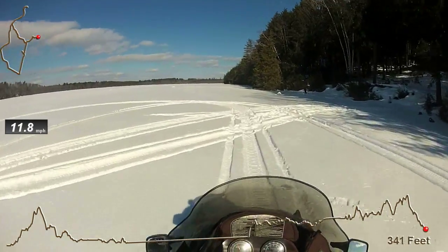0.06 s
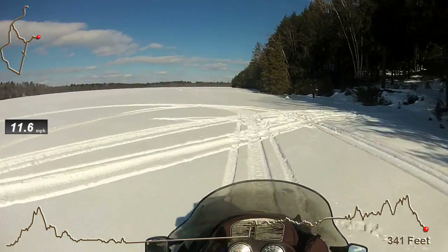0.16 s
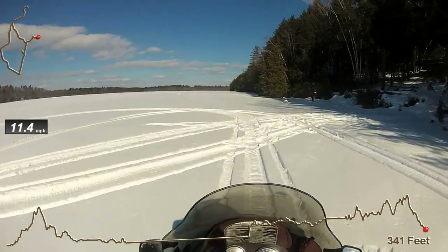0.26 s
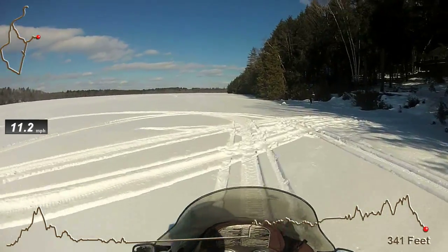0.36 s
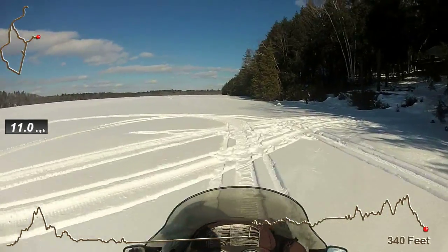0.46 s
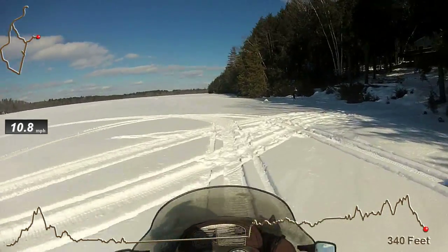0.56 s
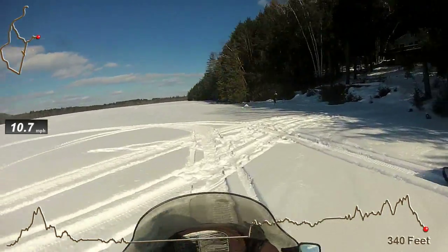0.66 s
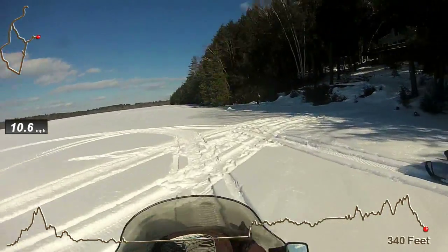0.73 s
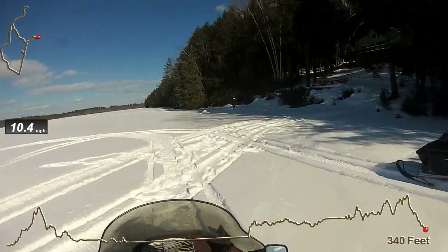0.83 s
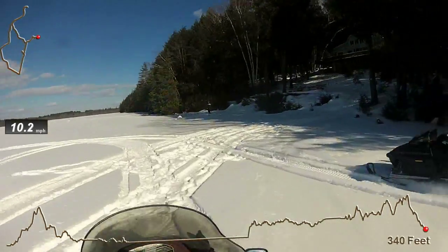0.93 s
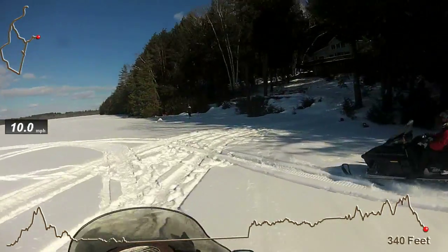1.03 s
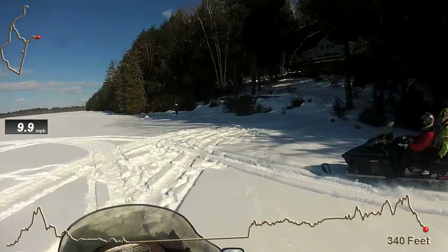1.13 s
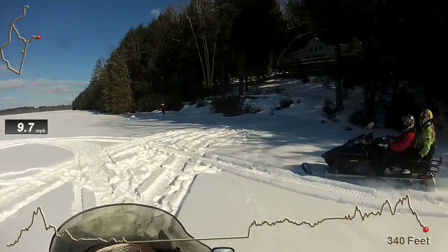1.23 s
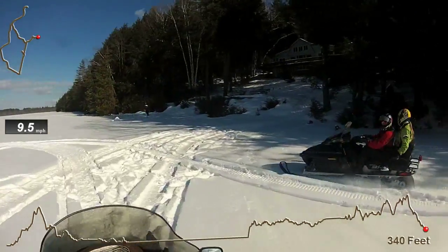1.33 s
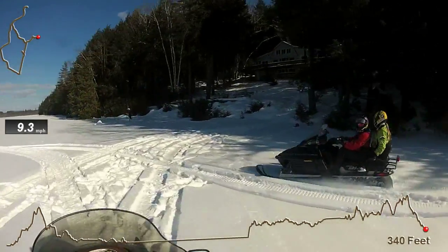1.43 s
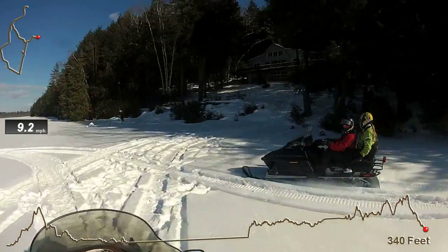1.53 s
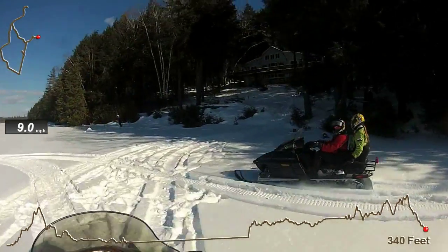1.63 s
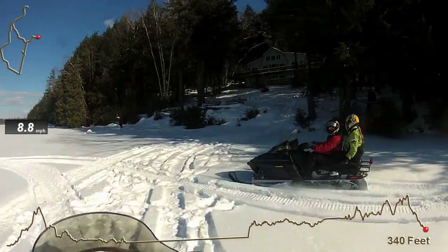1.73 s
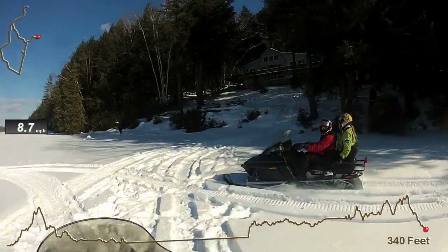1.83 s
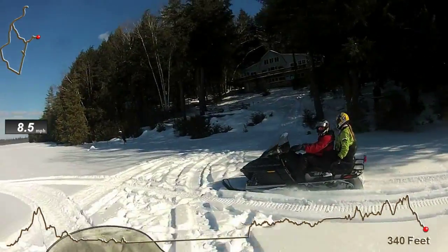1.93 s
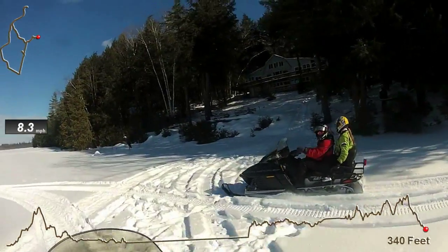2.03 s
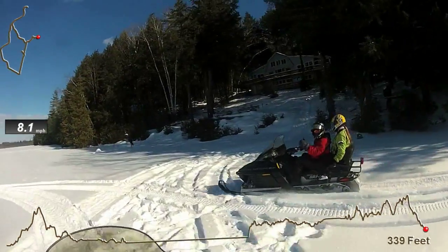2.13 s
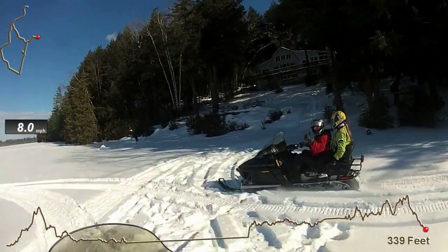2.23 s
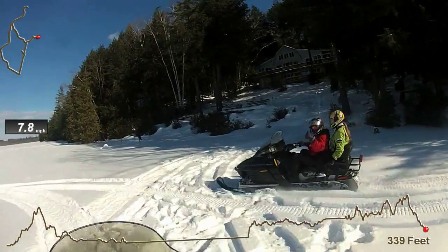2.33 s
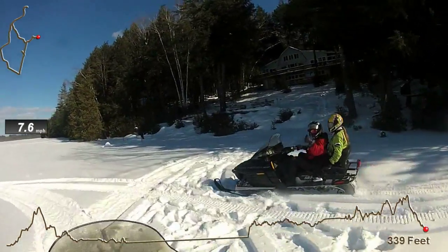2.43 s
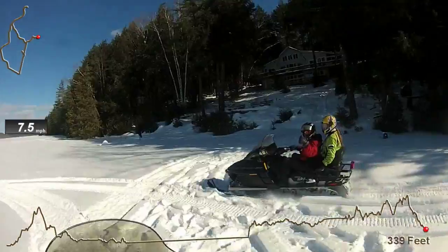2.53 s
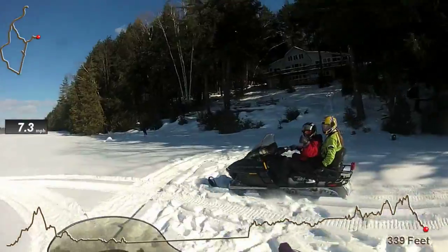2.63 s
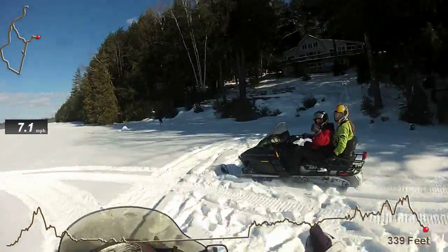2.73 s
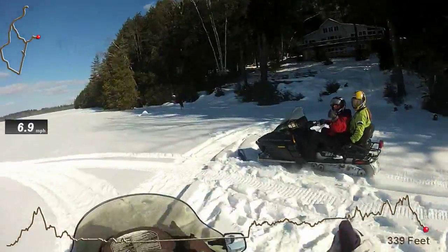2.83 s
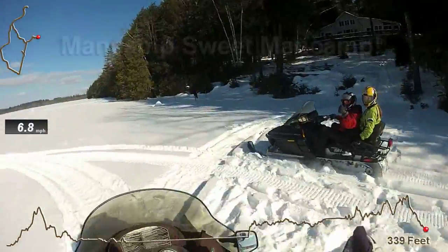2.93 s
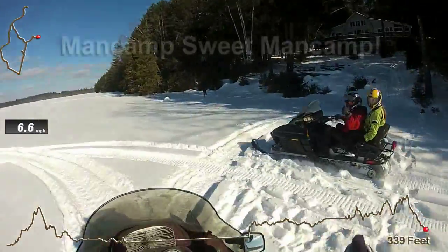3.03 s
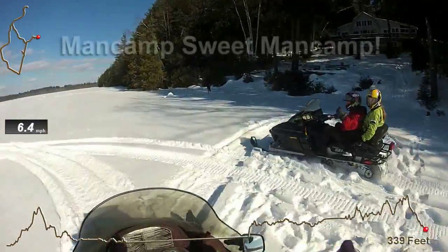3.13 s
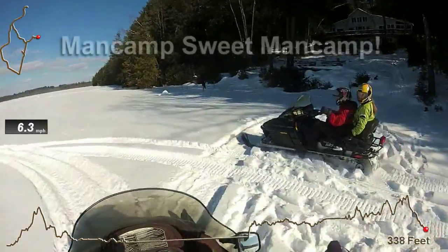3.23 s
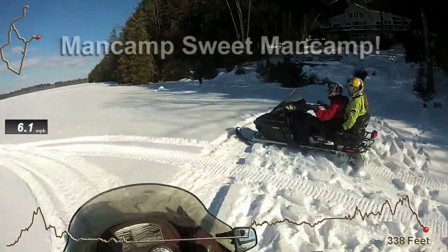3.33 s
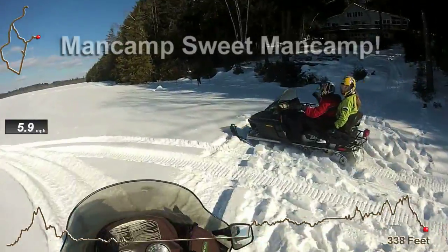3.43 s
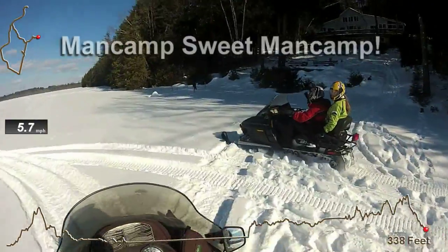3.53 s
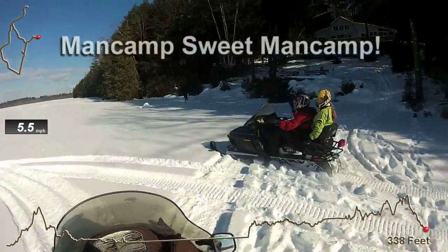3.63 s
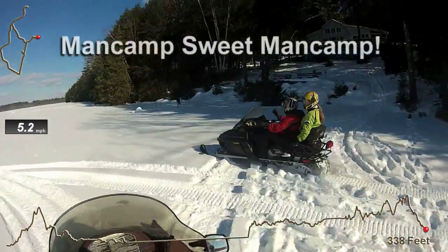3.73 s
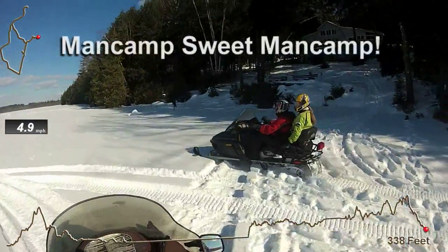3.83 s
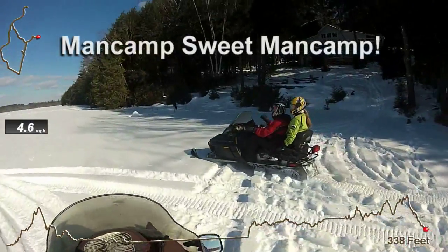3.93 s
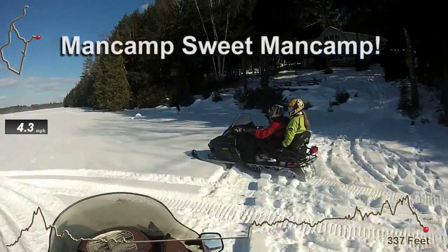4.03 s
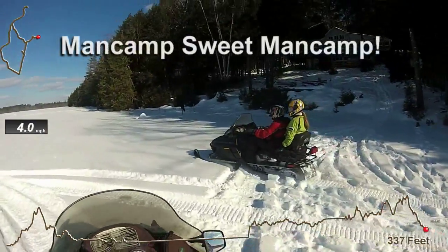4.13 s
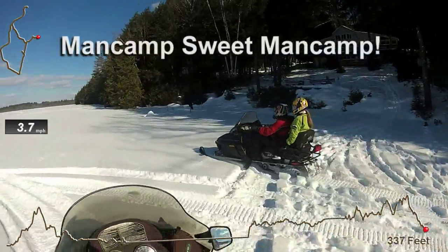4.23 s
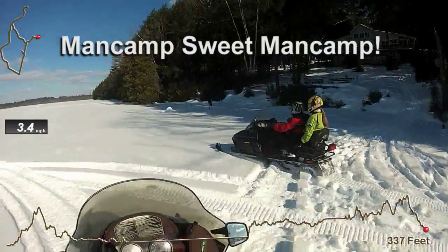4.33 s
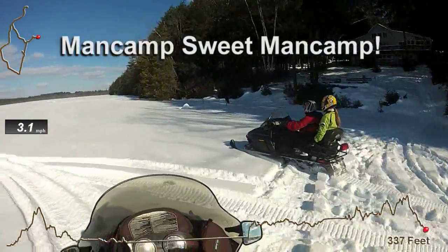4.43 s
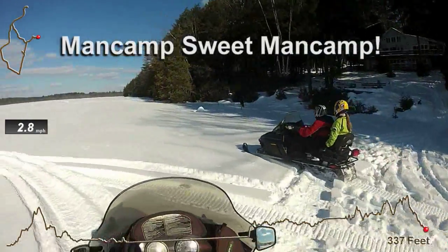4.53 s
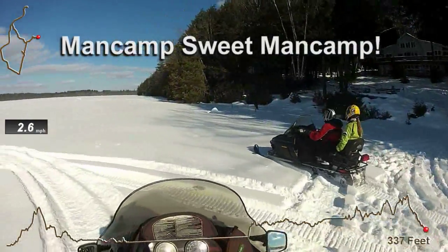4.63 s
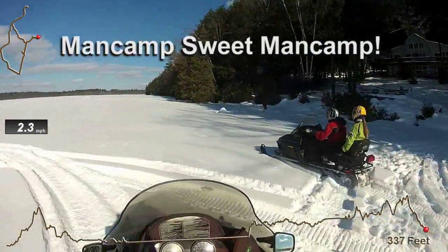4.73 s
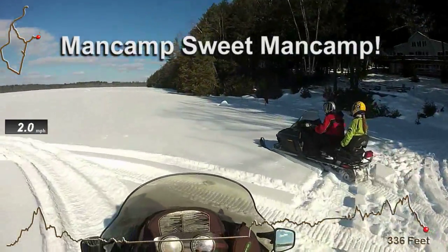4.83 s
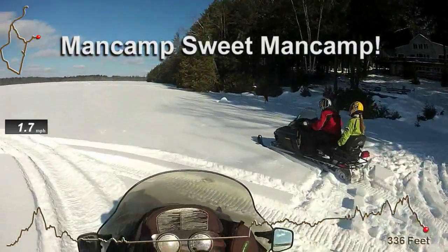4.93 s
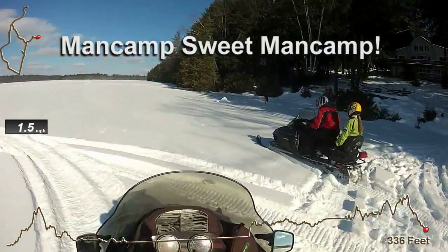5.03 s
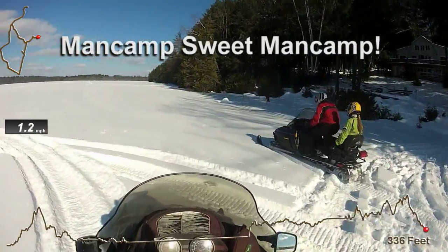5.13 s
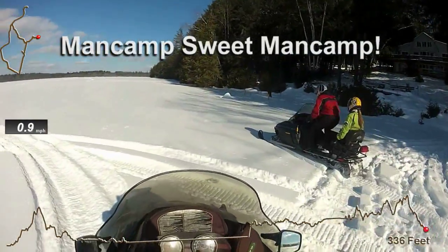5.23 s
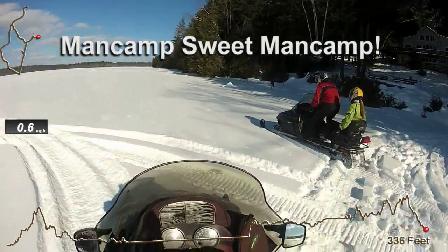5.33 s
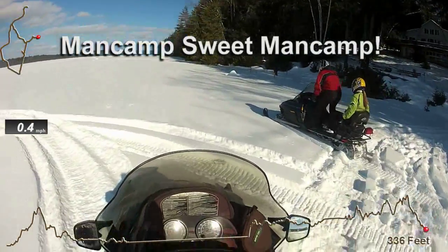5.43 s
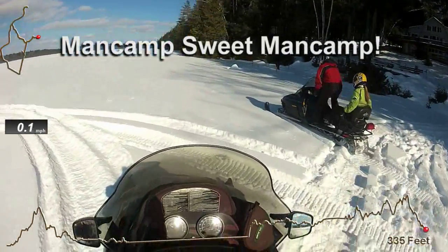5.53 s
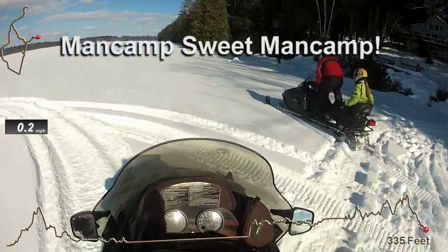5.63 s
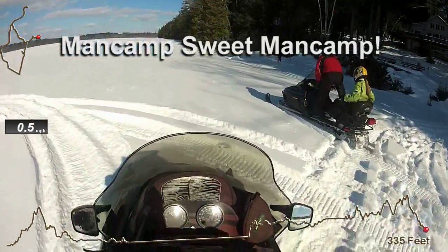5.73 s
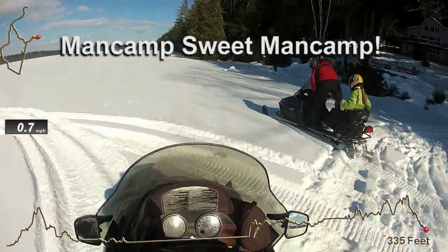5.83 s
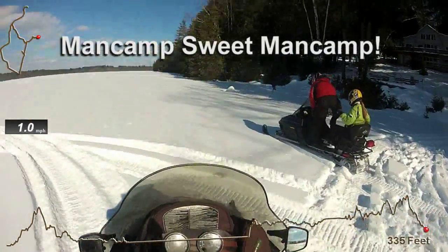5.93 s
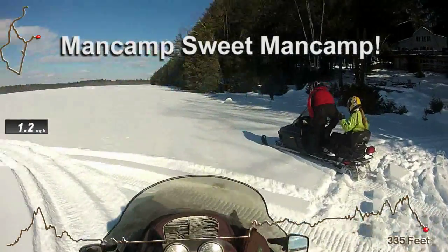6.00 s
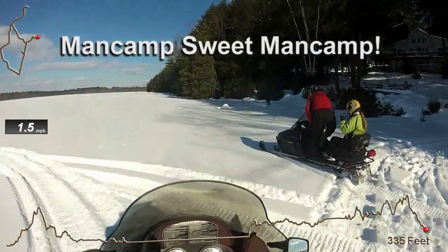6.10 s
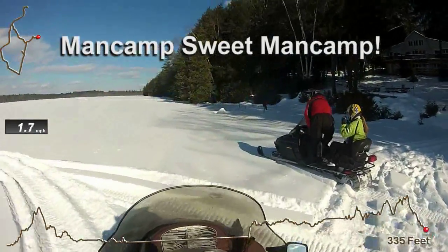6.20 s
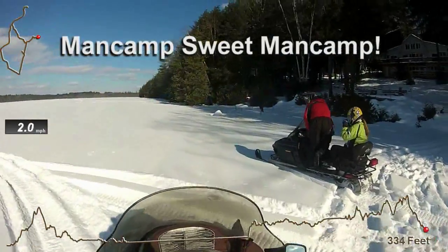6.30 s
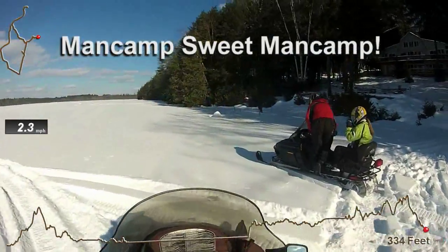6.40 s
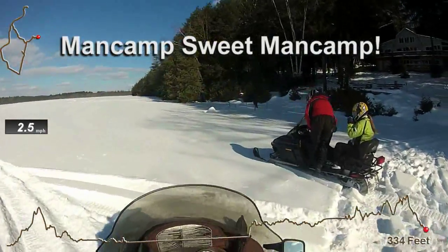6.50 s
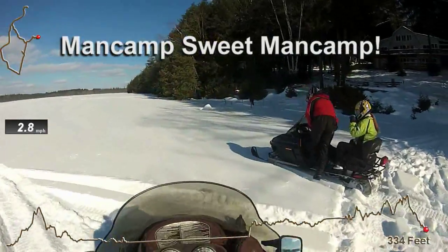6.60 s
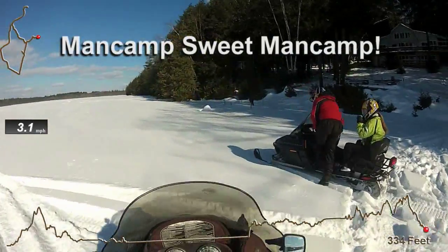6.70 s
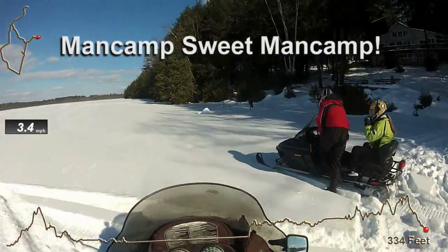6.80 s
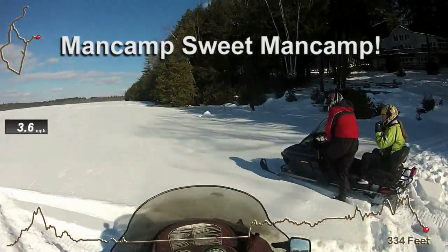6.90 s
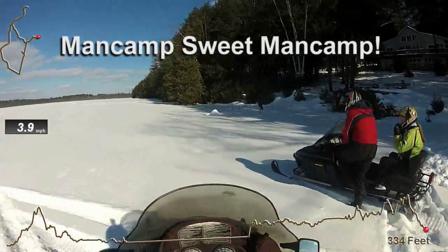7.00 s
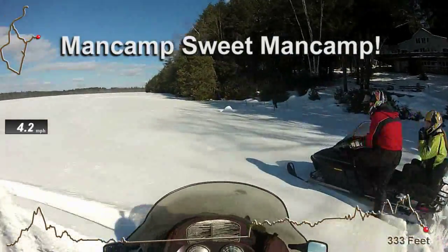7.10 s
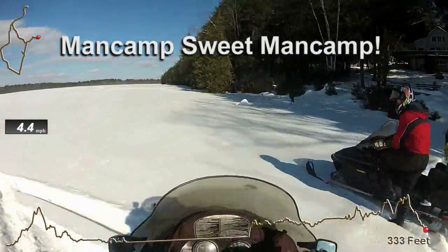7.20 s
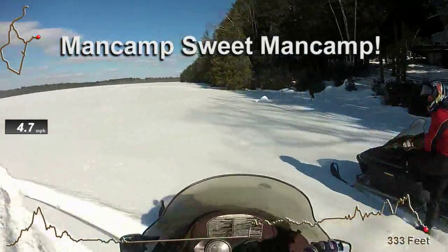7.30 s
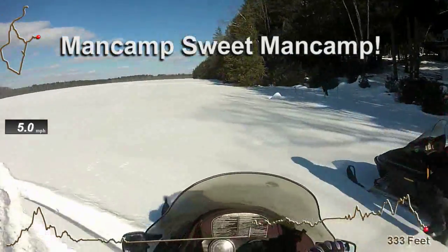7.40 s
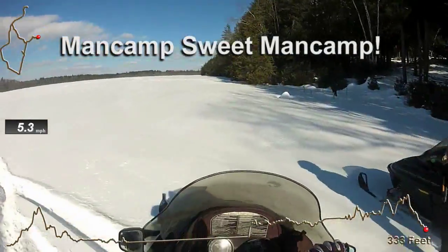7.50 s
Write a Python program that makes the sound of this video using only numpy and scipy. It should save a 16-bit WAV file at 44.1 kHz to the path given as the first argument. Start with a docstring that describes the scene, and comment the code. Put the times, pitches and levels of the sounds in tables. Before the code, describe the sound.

Close onboard sound of a snowmobile slowing on a snowy pond: throaty two-stroke buzz falling, rumbling roughly over ruts, then softening to separate putters. Another machine idles dully beside it. After a tiny squeak, one brisk throttle burst climbs to a steady raspy blare for about a second, then falls with a few loose knocks. No echo; lo-fi, fizzy treble.

```python
"""A twin-cylinder two-stroke snowmobile, heard from the rider's seat, coasts to a stop on a snowy pond, revs once
and eases off. Firings ring the exhaust, the crank shakes the hood, metal parts clatter and snow hisses.
A second sled winds down to idle nearby; the track drums, the chassis knocks and the brake squeaks.
The camera holds each sample at a low rate, which adds a fizzy top."""
import sys
import numpy as np
from scipy import signal
from scipy.fft import rfft, irfft
from scipy.io import wavfile
from scipy.ndimage import uniform_filter1d

SR = 44100
rng = np.random.default_rng(int(sys.argv[2]) if len(sys.argv) > 2 else 0)


def output_pcm(signal):
    """Save a mono or channel-first signal as 16-bit PCM at the path in sys.argv[1].

    Samples are clipped to [-1, 1] before scaling.
    """
    pcm = np.clip(np.atleast_2d(signal).T, -1, 1) * 32767
    wavfile.write(sys.argv[1], SR, np.round(pcm).astype(np.int16))


N = 333394

# Response of the exhaust pipe and silencer. Each row: frequency in Hz, relative level in dB.
PIPE = [(45, -45), (65, -11.5), (90, -7), (122, 7.5), (145, -0.5), (178, -12.5), (212, -10), (240, -22),
        (302, -8), (380, -33), (445, -29.5), (482, -19), (540, -37.5), (630, -11), (705, -24), (800, -69),
        (1000, -20.5), (1350, -27)]


def undb(db):
    """Decibels to amplitude gain."""
    return 10 ** (np.asarray(db) / 20)


def unit(x):
    """Scale to rms 1."""
    return x / np.sqrt(np.mean(x ** 2))


def steady(x, seconds=0.16):
    """Scale to a running rms of 1."""
    power = np.abs(uniform_filter1d(x ** 2, int(seconds * SR)))
    return x / np.sqrt(power + 1e-18)


def curves(table):
    """Each column after the first (time in s), interpolated to one value a sample."""
    s, *columns = np.transpose(table)
    return [np.interp(np.arange(N) / SR, s, c) for c in columns]


def noise():
    """White noise of spread 1."""
    return rng.standard_normal(N)


def walk(rate_hz):
    """Smoothed random steps of rms 1, rate_hz steps a second."""
    step = int(SR / rate_hz)
    held = np.repeat(rng.standard_normal(N // step + 1), step)
    return unit(uniform_filter1d(held, step)[:N])


def bump(x, centre, spread):
    """Gaussian bell of height 1, down to 1/e at the spread."""
    return np.exp(-((x - centre) / spread) ** 2)


def colour(x, points, size=8192):
    """Minimum-phase filter through (Hz, dB) points: a causal body set ringing."""
    hz, db = np.transpose(points)
    octave = np.log2(np.maximum(np.arange(size // 2 + 1) * SR / size, 1))
    known = np.log2(hz)
    outside = np.abs(octave - np.clip(octave, known[0], known[-1]))
    # 36 dB per octave beyond the end points, at most 60 dB
    response_db = np.interp(octave, known, db) - np.minimum(36 * outside, 60)
    # folding the cepstrum makes the response causal
    cepstrum = irfft(np.log(undb(response_db)))
    cepstrum[1:size // 2] *= 2
    cepstrum[size // 2 + 1:] = 0
    return signal.fftconvolve(x, irfft(np.exp(rfft(cepstrum))))[:N]


def firings(turns, scatter_db, weak_db, jitter):
    """Two pulses a crank turn, one per cylinder, scattered in size and time; every second one is weaker."""
    at = np.flatnonzero(np.diff(np.floor(2 * turns)))
    chance = rng.standard_normal((len(at), 2))
    size = undb(scatter_db[at] * chance[:, 0] - weak_db[at] * (np.arange(len(at)) % 2))
    # jitter: fraction of the firing interval per dB of scatter
    late = jitter * scatter_db[at] * chance[:, 1] * np.gradient(at)
    return np.bincount(np.clip(at + late, 0, N - 1).astype(int), size, N)


def clatter(turns, repeat, depth, count=70):
    """Impacts recurring at the same crank angles, plus noise, in a rush that swells with each firing."""
    angle, size = rng.random(count), rng.standard_normal(count)
    crank_angle = np.arange(int(turns[-1]) + 1)[:, None] + angle
    when = np.interp(crank_angle, turns, np.arange(N), right=N)
    sizes = size + 0.61 * rng.standard_normal(when.shape)
    impacts = np.bincount(when.astype(int).ravel(), sizes.ravel(), N + 1)[:N]
    rush = np.exp(depth * np.cos(4 * np.pi * turns))
    return (repeat * steady(impacts) + noise()) * rush


def effort(crank_hz, load):
    """Five level drivers: a constant, octaves below and above cruise, load, and the strain of speeding up."""
    cruise_hz, strain_lag_s = 50, 0.37
    octaves = np.log2(crank_hz / cruise_hz)
    # strain: upward octaves per second; the drive stays strained for a while
    keep = np.exp(-1 / (strain_lag_s * SR))
    strain = signal.lfilter([1 - keep], [1, -keep], np.maximum(np.gradient(octaves) * SR, 0))
    return np.array([np.ones(N), np.minimum(octaves, 0), np.maximum(octaves, 0), load, strain])


def drone(turns, crank_hz, load, soften_db=8, even_db=16, waver_db=2.0):
    """Regular part of the firings: crank overtones slide through the pipe's resonances; also their joint gain in dB."""
    # Overtone strength, from twice the crank rate upward. Each row: dB coasting, dB at full load.
    orders_db = [(3, 0.5), (-13, 1.5), (0, -3), (-1, -0.5), (-5.5, 7.5), (-6, -4), (-6, 1.5), (-8, -10),
                 (-3.5, 5), (-23, 5), (-19, -6), (-13, 9), (-23, 0), (-16, 0), (-6, -2), (-20, -17),
                 (-30, -19), (-23, -9)]
    pipe_hz, pipe_db = np.transpose(PIPE)
    # octaves below 55 Hz: the pulses soften and even out
    slow = np.maximum(np.log2(55 / crank_hz), 0)
    out, power = 0, 0
    for order, (coast_db, load_db) in enumerate(orders_db, 2):
        db = np.interp(np.log(order * crank_hz), np.log(pipe_hz), pipe_db)
        db += coast_db + load * (load_db - coast_db)
        db -= soften_db * slow * np.clip(order - 6, 0, 2)
        db -= even_db * slow ** 2 * (order % 2)
        waver = waver_db * (order > 4) * (1.48 - 0.73 * load) * walk(18)
        gain = undb(db + waver)
        phase = rng.uniform(-np.pi / 2, np.pi / 2)
        out = out + gain * np.cos(2 * np.pi * order * turns + phase)
        power = power + gain ** 2
    return out, 10 * np.log10(power)


def exhaust(turns, crank_hz, load, drive):
    """Clean under load, ragged off throttle, louder where an overtone meets a resonance of the pipe."""
    # Level laws: dB at cruise, dB per octave below it, dB per octave above it, dB at full load,
    # dB per octave a second of speeding up.
    boom_law = (-34.5, 4, 2.5, 2, 0.1)
    ring_law = (-53, 4, 5, -5, 4.5)
    # Brief dips and swells of the boom, the early ones as the two sleds' drones beat together.
    # Each row: middle in seconds, length in seconds, change in dB.
    level_dips_and_swells = [(0.126, 0.042, -8), (0.22, 0.064, 3), (0.266, 0.057, -4), (0.493, 0.067, -4),
                             (0.592, .05, 2), (.9, 0.045, -9), (3.368, 0.027, -10), (4.158, 0.4, 3),
                             (4.68, 0.18, -2), (5.01, 0.066, -2), (5.216, 0.095, -5.5), (6.851, .12, -4.5),
                             (7.118, 0.041, 1)]
    pipe_swell = 0.58  # share of the resonant gain that shows in the boom's level
    # uneven firing against the drone: coasting, change at full load, dB lost per dB of resonance
    ragged_coast_db, ragged_load_db, ragged_tuned = -6, -42, 0.95
    ragged_db_per_octave = 5  # below cruise the firing settles toward an even idle
    ring_hz, ring_width_hz = 480.5, 19.7  # the pipe's sharpest resonance
    # swell as the eighth overtone crosses the ring: coasting, more at full load, half width
    bloom_db, bloom_load_db, bloom_hz = 7, 3, 13
    flutter_db, ring_flutter_db = .7, 2

    tone, tuned_db = drone(turns, crank_hz, load)
    # off throttle each firing is stronger or weaker than the mean
    at = np.flatnonzero(np.diff(np.floor(2 * turns)))
    uneven = np.bincount(at, rng.standard_normal(len(at)), N)
    ragged_db = ragged_coast_db + ragged_load_db * load ** 2
    ragged_db += ragged_db_per_octave * drive[1] - ragged_tuned * tuned_db
    boom = steady(tone) + undb(ragged_db) * steady(colour(uneven, PIPE[:8]))
    t = np.arange(N) / SR
    dip_swell_db = sum(db * bump(t, s, length / 2) for s, length, db in level_dips_and_swells)
    boom_db = np.dot(boom_law, drive) + pipe_swell * tuned_db + dip_swell_db
    boom_db += flutter_db * (1 - load) * walk(20)

    # with the throttle open the pulses are regular, so overtones glide through the ring
    scatter_db = .7 + 4 * (1 - load) ** 3
    gas = steady(firings(turns, scatter_db, np.full(N, 3), jitter=.008)) + .3 * noise()
    ring = signal.lfilter(*signal.iirpeak(ring_hz, ring_hz / ring_width_hz, fs=SR), gas)
    ring = signal.lfilter(*signal.iirpeak(ring_hz, 3, fs=SR), ring)
    crossing = bump(8 * crank_hz, ring_hz, bloom_hz)
    ring_db = np.dot(ring_law, drive) + crossing * (bloom_db + bloom_load_db * load)
    ring_db += ring_flutter_db * (1 - load) * walk(25)
    return steady(boom) * undb(boom_db) + steady(ring) * undb(ring_db)


def engine():
    """The rider's own machine: exhaust, shaking hood, metal clatter, snow under the skis and chassis rumble."""
    # Each row: time in seconds, crankshaft turns per second in Hz.
    crank = [(0.0, 67.1), (0.9, 61.44), (2.1, 53.24), (2.84, 46.18), (3.14, 42.64), (3.75, 32.67),
             (4.15, 28.84), (4.86, 24.1), (5.01, 26.24), (5.13, 34.07), (5.3, 50.76), (5.69, 73.63),
             (5.91, 70.02), (6.7, 70.66), (6.97, 59.7), (7.33, 52.94), (7.56, 50.58)]
    # Each row: time in seconds, throttle load from 0 to 1.
    throttle = [(0, 0), (1.4, 0.2), (2.3, 0), (4.3, 0.28), (4.95, 0.08), (5.2, 0.32), (5.85, 0.96),
                (6.7, 0.97), (7, 0.11), (7.56, 0)]
    # Spectra of the engine case, fins, snow and chassis. Each row: frequency in Hz, relative level in dB.
    case_spectrum = [(320, -31.5), (540, -12), (590, -8), (629, -1.5), (684, 1), (755, -6.5), (800, -9),
                     (905, 2.5), (1040, -1.5), (1110, 3), (1290, 7), (1540, -8), (1750, -8), (2280, -37.5),
                     (3850, -120)]
    fins_spectrum = [(940, -44.5), (1600, 2.5), (1820, 3), (2110, 6.5), (2320, 12.5), (2560, 4), (2790, -1),
                     (2880, -34), (3000, -1), (3900, -72), (6600, -120)]
    snow_spectrum = [(1650, -23), (2800, -13), (2870, -2), (3110, 1), (3290, 0), (3630, 1.5), (4610, -8.5),
                     (4970, -2.5), (5360, -1), (5650, -4), (5900, 9.5), (7670, -54), (13000, -120)]
    rumble_spectrum = [(15, -35), (35, -2), (55, 6), (110, -6), (220, -3), (320, -6), (420, -15),
                       (700, -26.5)]
    # Level laws: dB at cruise, dB per octave below it, dB per octave above it, dB at full load,
    # dB per octave a second of speeding up.
    shake_law = (-48.5, 5, -0.5, 2, -1)
    case_law = (-44.5, 12, 10.5, -7.5, 2.5)
    fins_law = (-47.5, 16, 11.5, -5, 0.7)
    snow_law = (-51.5, 12.5, 8.5, -3, 1.1)
    rumble_law = (-45, 9.5, 6.5, -7, 2)
    # hood resonance: centre, half width, height
    hood_hz, hood_spread_hz, hood_boom_db = 50.8, 2.7, 5.5
    # crossing rutted snow: middle, half length, extra shaking, extra rumble
    ruts_s, ruts_half_s, ruts_shake_db, ruts_rumble_db = 2.847, .55, 9, 4

    crank_hz, = curves(crank)
    load = np.clip(curves(throttle)[0], 0, 1)
    drive = effort(crank_hz, load)
    # the crank angle jitters, more off throttle, which smears the high overtones
    turns = np.cumsum(crank_hz) / SR + (.009 - .006 * load) * walk(70)

    # the hood shakes once a turn and booms as the crank passes its resonance
    ruts = bump(np.arange(N) / SR, ruts_s, ruts_half_s)
    shake_db = np.dot(shake_law, drive) + ruts_shake_db * ruts
    shake_db += hood_boom_db * bump(crank_hz, hood_hz, hood_spread_hz)
    shake_db += 2 * (1 - load) * walk(16)
    shake = np.sqrt(2) * np.sin(2 * np.pi * turns) * undb(shake_db)

    # under load the metal parts strike more alike from turn to turn
    repeat = 0.38 + 0.64 * load
    case_db = np.dot(case_law, drive) + 0.66 * walk(25)
    case_sound = unit(colour(clatter(turns, repeat, depth=0.083), case_spectrum)) * undb(case_db)
    fins_db = np.dot(fins_law, drive) + 0.87 * walk(30)
    fins = unit(colour(clatter(turns, repeat, depth=0.036), fins_spectrum)) * undb(fins_db)

    grains = clatter(turns, repeat=0.21, depth=0.016) * undb(1.52 * walk(400))
    snow_db = np.dot(snow_law, drive) + 0.75 * walk(27)
    snow = unit(colour(grains, snow_spectrum)) * undb(snow_db)

    # the chassis rumbles with the running gear, less when the drive is taut
    rumble_db = np.dot(rumble_law, drive) + ruts_rumble_db * ruts + 1.3 * walk(4)
    rumble = unit(colour(noise(), rumble_spectrum)) * undb(rumble_db)
    return exhaust(turns, crank_hz, load, drive) + shake + case_sound + fins + snow + rumble


def companion():
    """The second sled's exhaust: uneven firings, dull with distance, slowing to a lumpy idle."""
    # Each row: time in seconds, crankshaft turns per second in Hz, level in dB.
    second_sled = [(0, 63.08, -38.5), (.6, 57.4, -45), (1.4, 49.6, -51), (2.3, 34.15, -43.5),
                   (3.3, 25.76, -44), (4.1, 25.05, -67), (4.8, 25.47, -53), (6.2, 25.57, -61),
                   (7.56, 25.25, -44)]
    crank_hz, db = curves(second_sled)
    turns = np.cumsum(crank_hz) / SR
    pulses = firings(turns, np.full(N, 1.5), np.full(N, 1.2), jitter=0.0034)
    dull = [(50, -30), (100, -9), (145, -10), (190, -27), (300, -33.5)]
    return steady(colour(pulses, dull)) * undb(db)


def track():
    """Rubber lugs drum on the snow at a rate that follows the ground speed: a wavering tone and its octave."""
    # Each row: time in seconds, mean lug rate in Hz, mean level in dB.
    lugs = [(0, 334.7, -68), (2.2, 205, -67), (3, 160.9, -48), (3.5, 132.6, -46), (4, 101.2, -42.5),
            (4.4, 75.74, -46), (4.8, 50.75, -44.5), (5.05, 46.13, -50), (5.4, 68, -97), (7.56, 179.2, -46)]
    lug_hz, db = curves(lugs)
    phase = 2 * np.pi * np.cumsum(lug_hz * (1 + 0.01754 * walk(18))) / SR
    drumming = np.sin(phase) + 0.055 * np.sin(2 * phase)
    return unit(drumming) * undb(db + 1.7 * walk(12))


def knocks(decay_s=0.004):
    """Short bright knocks from loose parts of the chassis: decaying bursts of coloured noise."""
    # Each row: start in seconds, envelope peak in dB ahead of the 0.4 gain.
    strikes = [(3.937, -37.5), (6.952, -32), (7.001, -30.5), (7.158, -36)]
    envelope, t = np.zeros(N), np.arange(N) / SR
    for s, db in strikes:
        envelope += undb(db) * (t >= s) * np.exp(-np.abs(t - s) / decay_s)
    bright = [(900, -6), (2000, -5), (3200, 1), (4000, -5), (5000, -2), (5700, 0)]
    return .4 * envelope * unit(colour(noise(), bright))


def brake():
    """A brief squeak, likely the brake disc, as the sled stops: one sine with a jittery pitch."""
    # Each row: time in seconds, mean pitch in Hz, level in dB.
    chirp = [(4.94, 2080, -80), (4.953, 2085, -52), (4.988, 2020, -52), (5.005, 2065, -79)]
    hz, db = curves(chirp)
    # silent outside the table's span
    sounding = db > max(db[0], db[-1])
    phase = 2 * np.pi * np.cumsum(hz * (1 + .02 * walk(500))) / SR
    return sounding * np.sqrt(2) * undb(db) * np.sin(phase)


def scene():
    """Both sleds in the open, with no walls to echo."""
    return (engine() + companion() + track() + knocks() + brake())[None]


def record(dry):
    """The camera samples at a low rate and holds each value; the steps mirror the sound into the treble."""
    hold_hz, band_hz, top_hz = 12000, 5600, 15200
    leak_db = -19  # sound that slips past the input filter
    band = signal.sosfilt(signal.ellip(8, .1, 50, band_hz, fs=SR, output="sos"), dry)
    samples = signal.resample_poly(band + undb(leak_db) * dry, hold_hz, SR, axis=1)
    held = np.repeat(samples, 4, axis=1)
    steps = signal.resample_poly(held, SR, 4 * hold_hz, axis=1)[:, :N]
    return signal.sosfilt(signal.ellip(12, .1, 80, top_hz, fs=SR, output="sos"), steps)


dry = scene()
out = record(dry)
output_pcm(out)
```